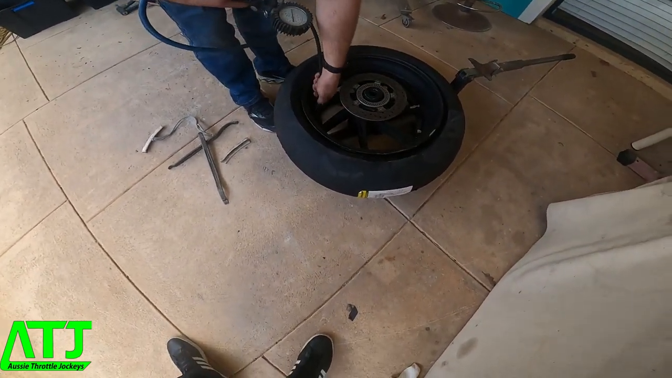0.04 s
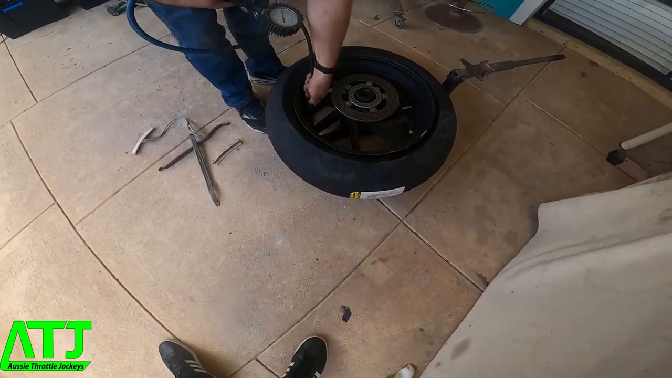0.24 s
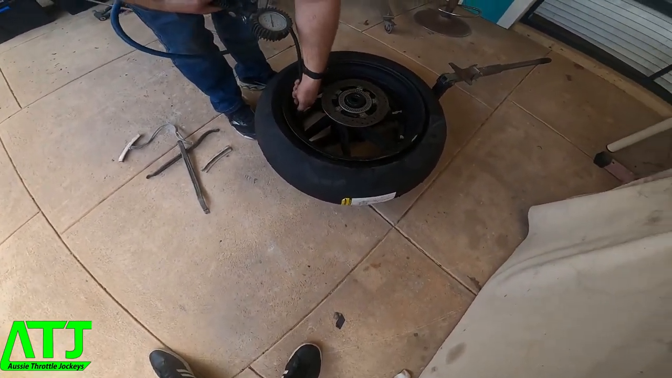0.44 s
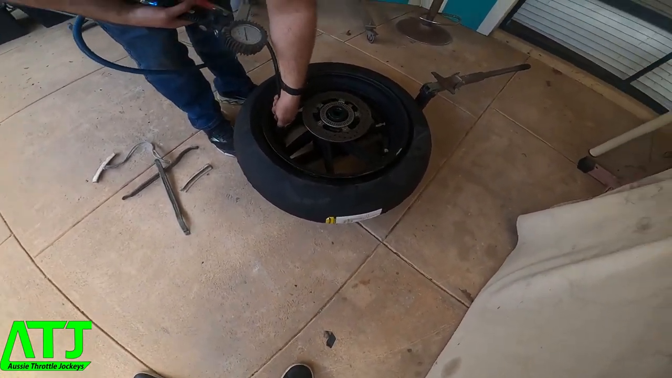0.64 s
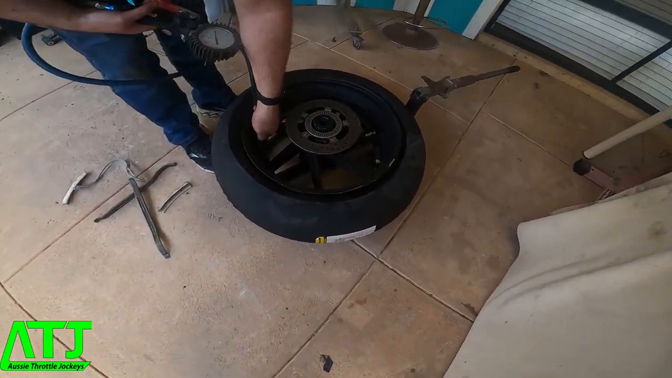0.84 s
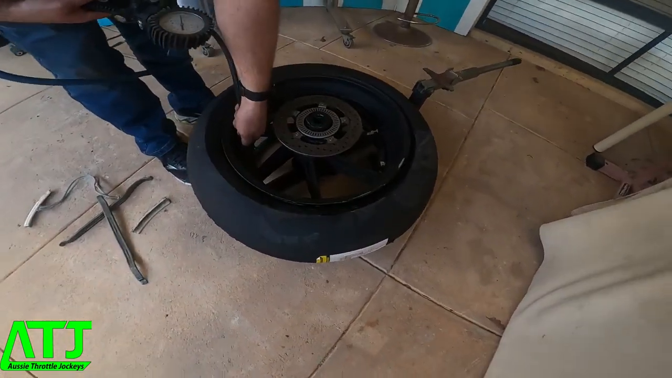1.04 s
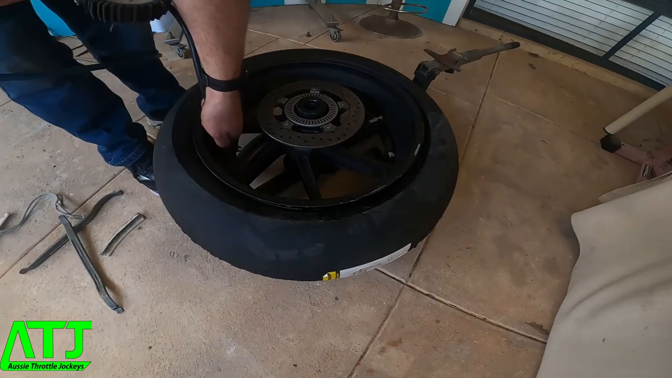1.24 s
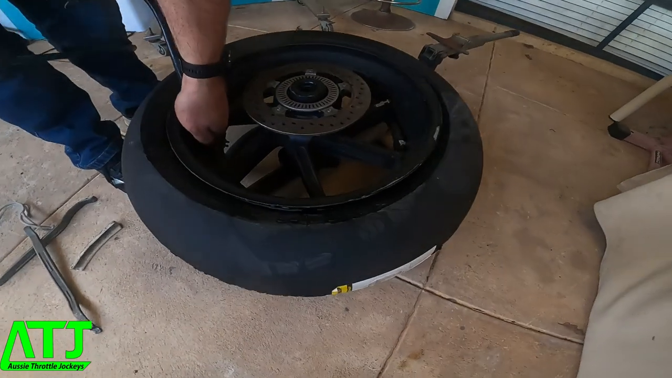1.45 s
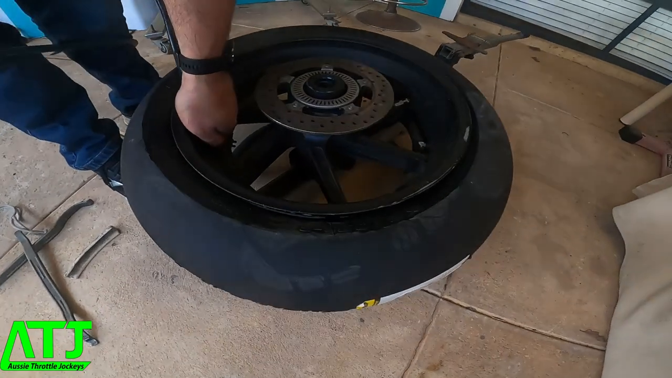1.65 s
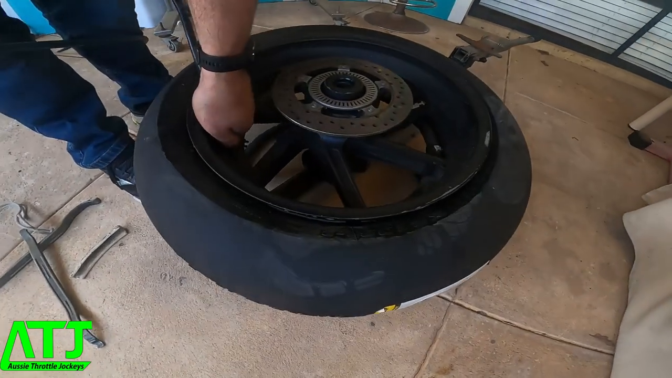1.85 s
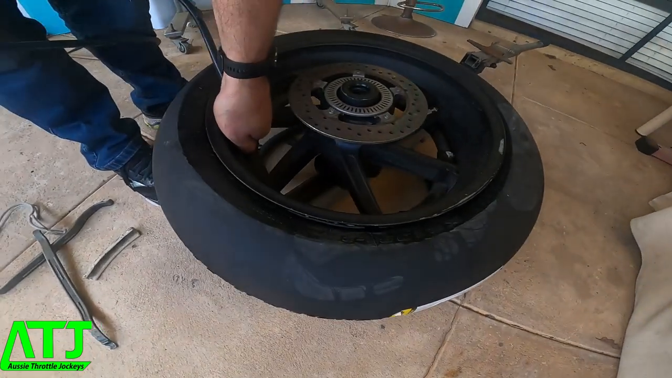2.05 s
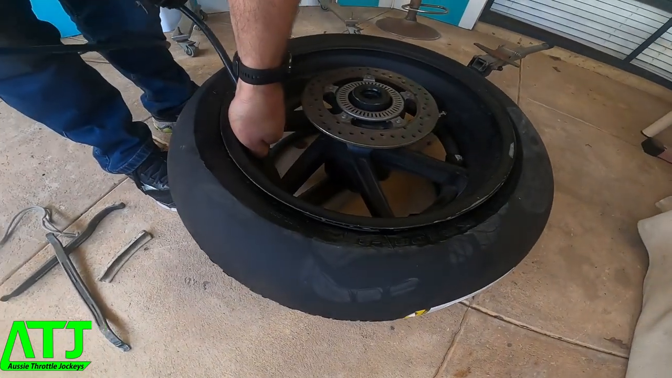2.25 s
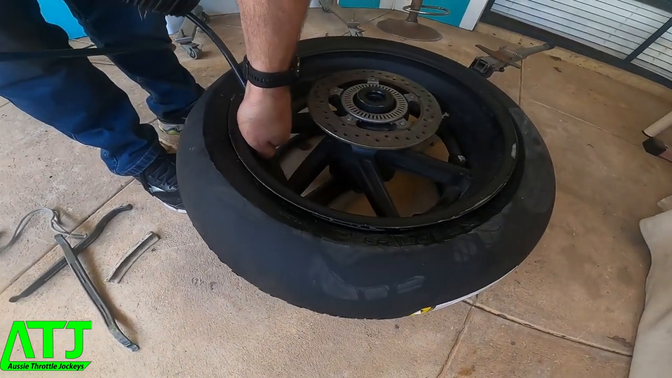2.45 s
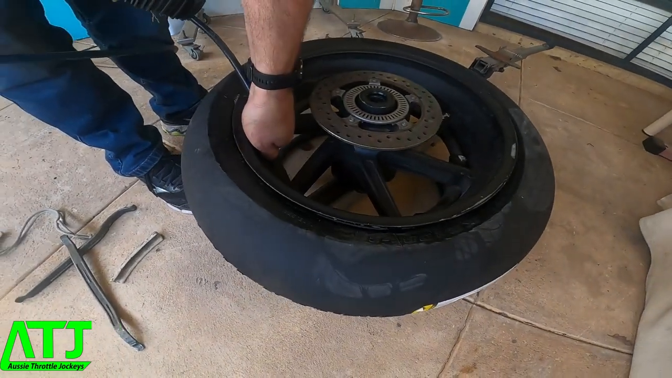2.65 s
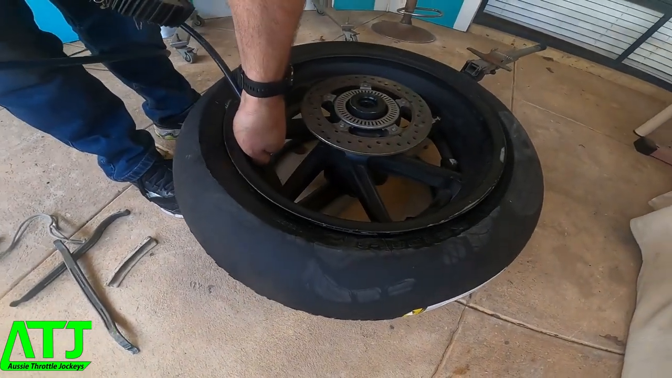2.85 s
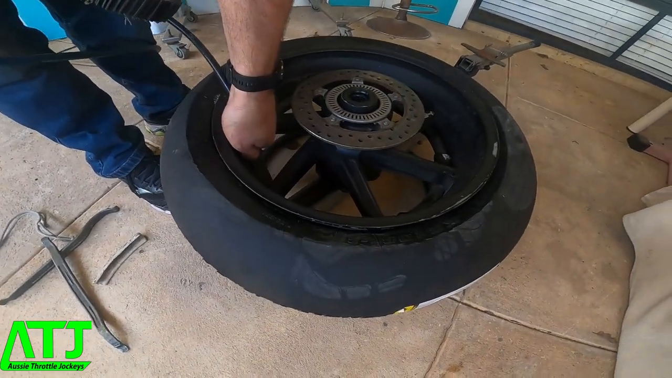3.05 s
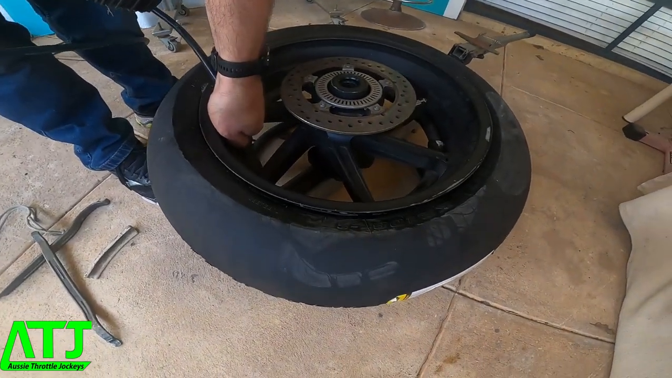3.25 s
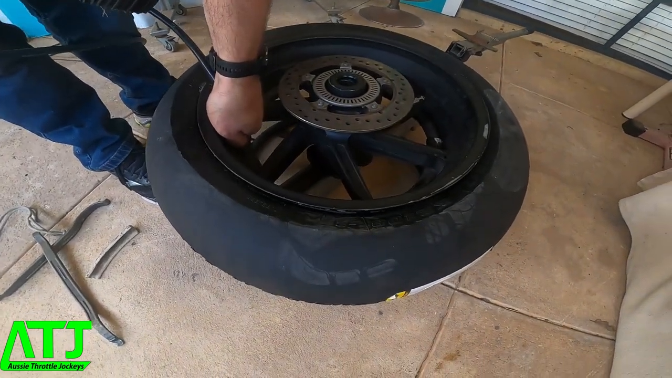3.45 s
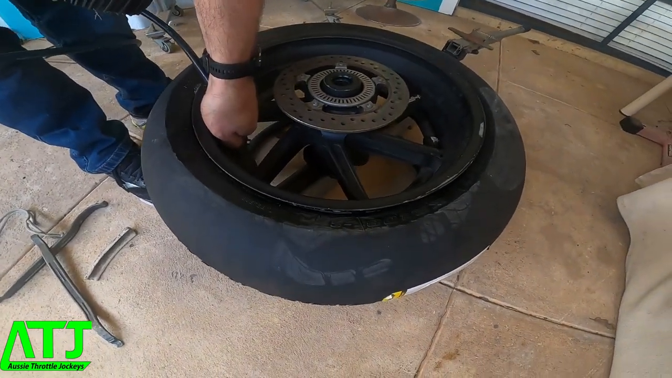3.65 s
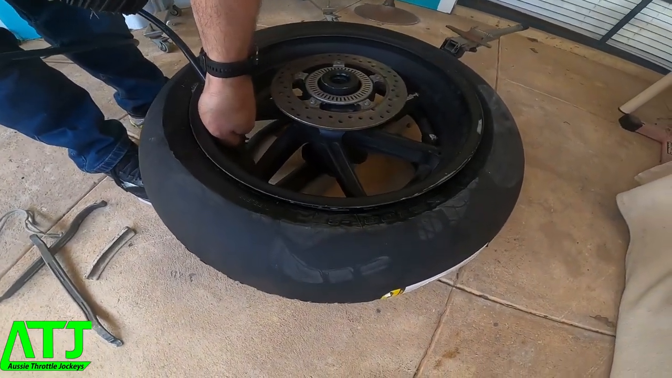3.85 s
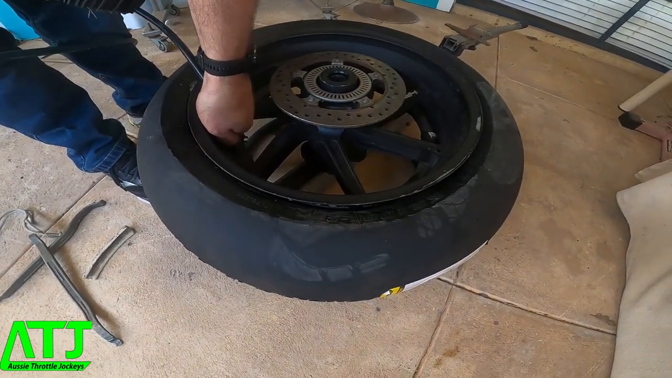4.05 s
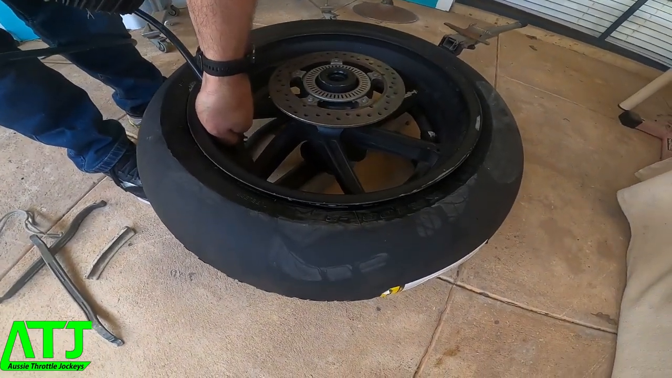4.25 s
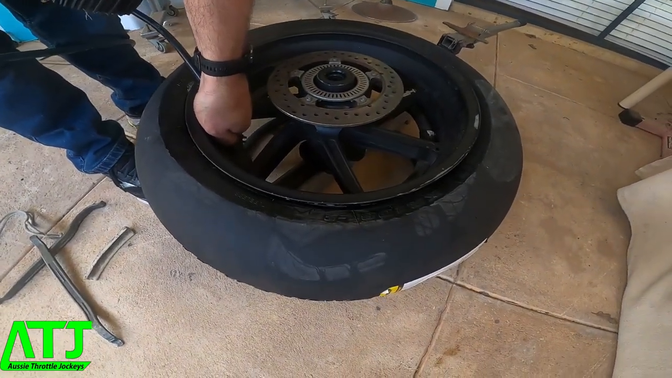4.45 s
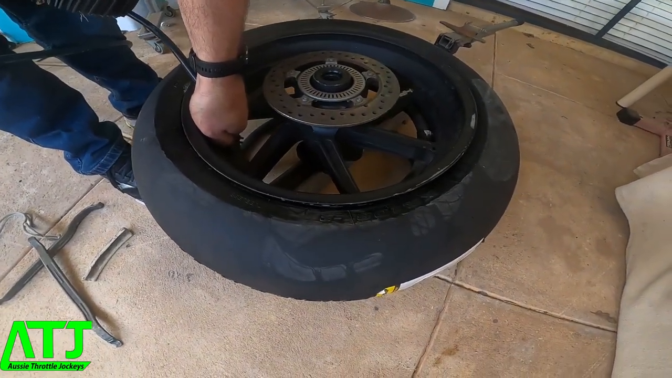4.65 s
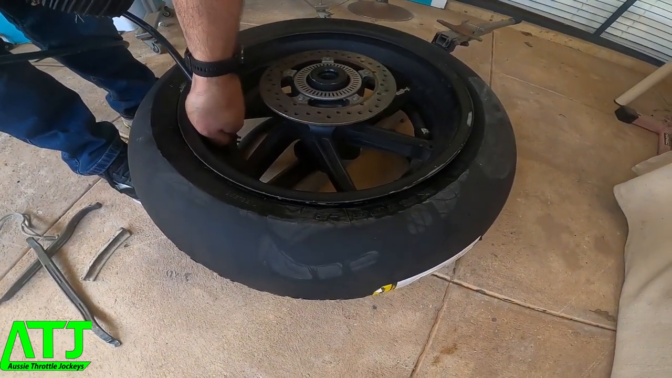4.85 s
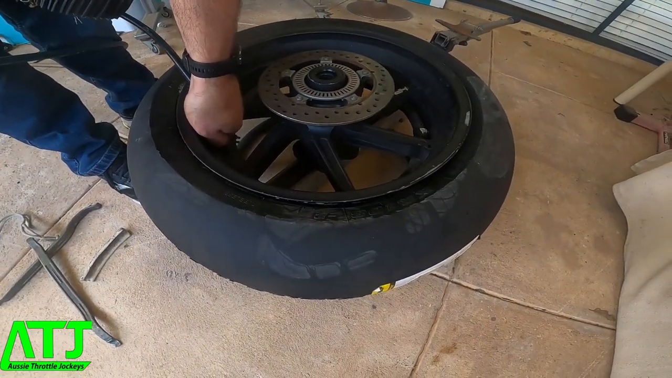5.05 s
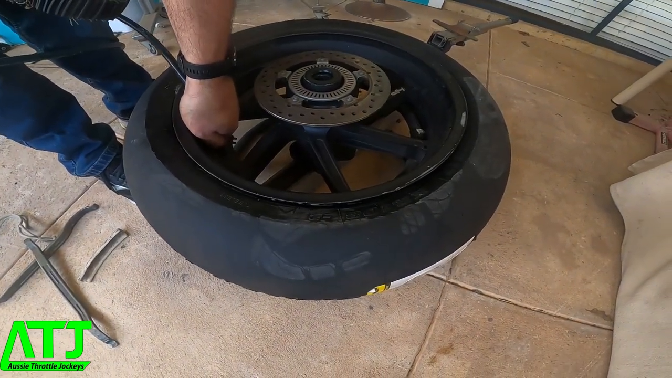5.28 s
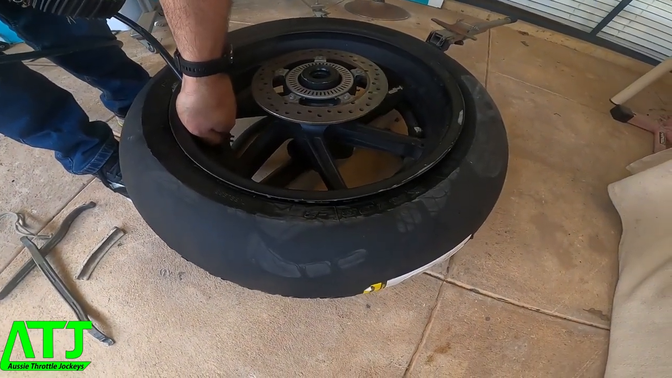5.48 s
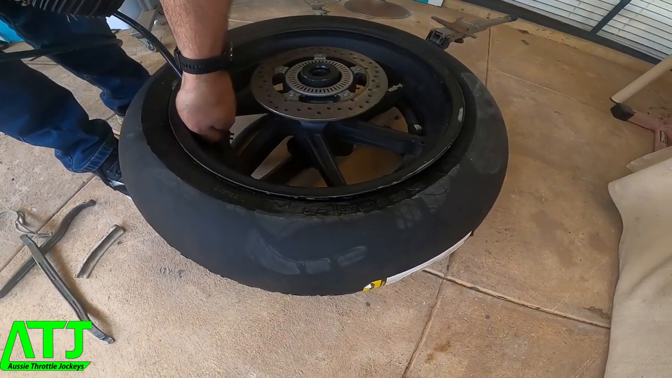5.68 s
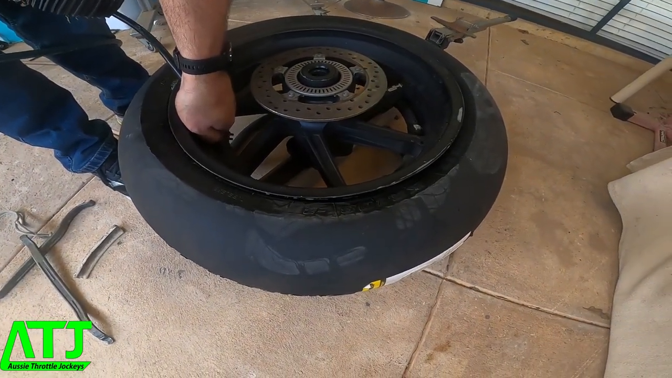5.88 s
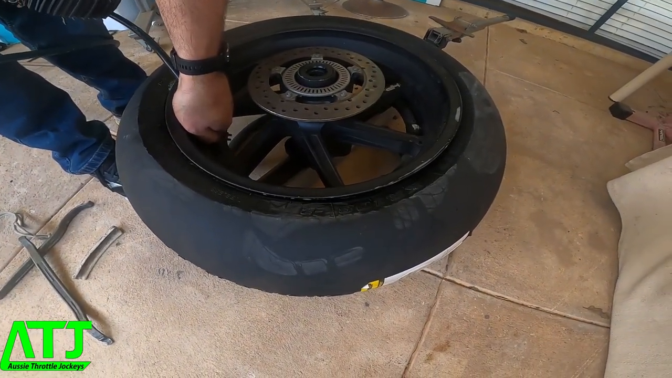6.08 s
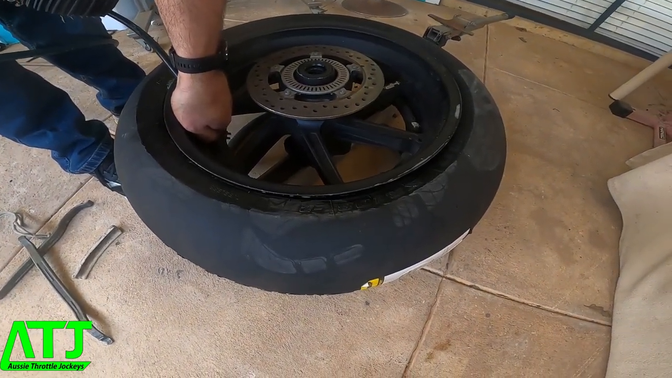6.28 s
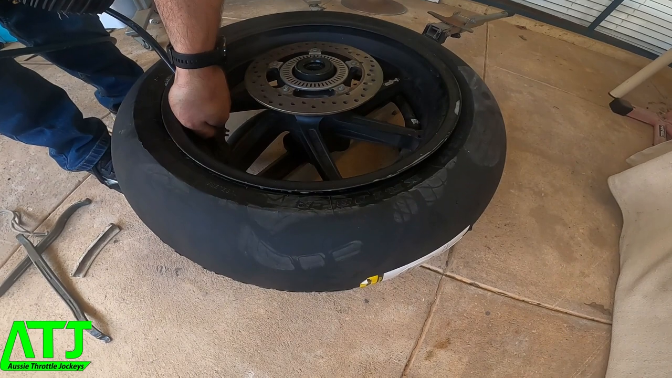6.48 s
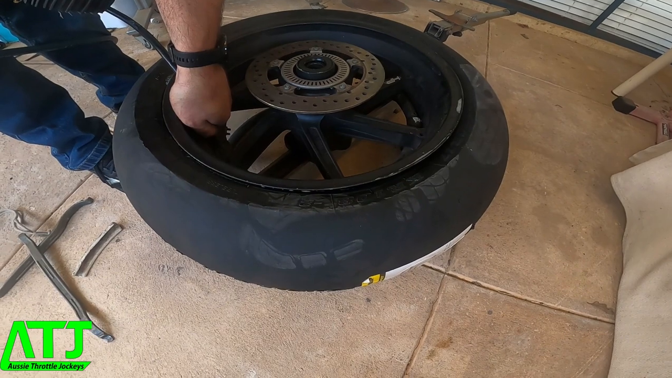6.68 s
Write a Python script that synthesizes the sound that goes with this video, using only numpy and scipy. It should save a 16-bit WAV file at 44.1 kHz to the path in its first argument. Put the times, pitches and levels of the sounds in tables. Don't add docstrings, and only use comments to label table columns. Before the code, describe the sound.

A quiet garage with soft low rumble; a faint motor tone stops around 0.3 seconds while a thin high air leak dwindles. At 0.5 a brief hose scuff and tiny metal tick sound, with another click at 0.9. From 1.0 to 1.25 brass ticks rattle rapidly against the valve and rim, mixed with scraping and dull knocks. Around 1.45 to 1.6 heavier, tightly damped thumps hit the slack tyre, with duller clicks and rubbing; a crisp clip snaps at 1.7. At 2.04 the valve gives way with a sharp click and low thump. Loud air bursts in, brightest at first, then a steady hiss coloured by many metallic, hollow resonances. From 3.0 to 3.7 the rough escaping air subsides as the bead settles. The resonant hiss continues to the end at about 6.5, slowly losing level and treble, over a barely audible compressor hum until nearly 5.

```python
import sys
import numpy as np
from scipy import signal
from scipy.fft import rfft, irfft, next_fast_len
from scipy.io import wavfile
from scipy.ndimage import uniform_filter1d

SR = 44100
rng = np.random.default_rng(int(sys.argv[2]) if len(sys.argv) > 2 else 0)


def bounce(signal):
    frames = np.transpose(np.atleast_2d(signal))
    limited = np.clip(frames, -1, 1)
    pcm = np.round(limited * 32767).astype(np.int16)
    wavfile.write(sys.argv[1], SR, pcm)


def decibels_to_gain(level_db):
    exponent = np.asarray(level_db, float) / 20
    return 10 ** exponent


N = 296352
T = np.arange(N) / SR
M = next_fast_len(N)
HZ = np.maximum(np.arange(M // 2 + 1) * SR / M, 1)

# frequency_hz, density_db (per Hz)
RUMBLE_COLOUR = [(12, -32), (20, -11), (54, 7), (130, -2.5), (150, -3), (186, -8), (216, -15), (247, -19.5),
                 (300, -18), (390, -53), (660, -120)]
STILL_AIR_COLOUR = [(200, -22), (300, -20), (550, -23), (1200, -25), (1800, -22), (2500, -17), (4000, -21),
                    (7600, -29), (11000, -37), (13500, -44), (15500, -47)]
SEEP_COLOUR = [(350, -72), (600, -42), (2490, -27), (3560, -2), (4160, 0), (4880, -10), (6270, -32),
               (7940, -35), (10200, -26), (14000, -39), (15500, -48)]
SCUFF_COLOUR = [(290, -88), (600, -25), (922, -3.5), (1250, 5), (1750, -6), (2400, -11), (2900, -16),
                (3550, -5), (4300, -19), (5300, -20), (6500, -13.5), (8000, -26), (15000, -48)]
RUB_COLOUR = [(240, -44), (400, -41.5), (602, -28), (894, 0.5), (1310, 2.5), (1540, -2), (1690, -4),
              (2190, -2), (3050, -5), (3660, -5), (4130, -6.5), (7470, -17.5), (15000, -47)]
JET_COLOUR = [(180.0, -35.8), (500.0, -34.7), (1150.0, -37.4), (1500.0, -29.5), (2200.0, -26.6),
              (3000.0, -25.9), (3600.0, -25.2), (4500.0, -17.7), (5500.0, -16.8), (7000.0, -16.7),
              (8500.0, -18.9), (13000.0, -28.3)]
SEAL_COLOUR = [(88, -25), (150, -25.5), (620, -17), (798, -19), (1740, -13), (2030, -24), (2990, -6),
               (3420, -4), (5680, -7), (7450, -1.5), (8210, -6), (12100, -63), (15600, -5)]
LOOSE_COLOUR = [(20, -2), (1700, -3), (1850, -1), (3000, -1), (3700, 1), (4100, 3), (4500, 0), (4800, -3),
                (5150, 1), (5500, -1), (5800, -9), (6050, -2), (6900, -4), (7600, -2), (7950, -5),
                (8400, 0), (8750, -4), (9000, -1), (17000, -1)]
# frequency_hz, gain_db
RUSH_COLOUR = [(1300, 2.5), (1800, -4.5), (2400, -3), (3200, -1.5), (5500, 0.5), (6100, 3), (6900, 6.5),
               (8000, -0.5), (13000, 1)]

# peak_s, rise_s, fall_s, rumble_db, murmur_db (relative)
SHIFTS = [(.27, 0.19, 0.37, -58, -26), (.56, 0.28, 0.8, -48.5, -23), (.8, 0.45, 0.24, -63, 21),
          (1.0, 0.057, 0.32, -63, 24.5), (1.23, 0.15, 0.2, -46, 11), (1.54, 0.087, 0.085, -45.5, 23.5),
          (1.68, 0.22, 0.28, -54.5, 11.5), (1.95, 0.29, 0.12, -55.5, -15), (2.046, 0.013, 0.15, -33.5, 0),
          (2.24, 0.29, 0.68, -61.5, 26), (6.0, 3.8, 1.2, -59.5, -2), (3.8, 0.45, 0.65, -62, -10),
          (6.25, .4, 0.31, -64, -3)]
# time_s, pitch_hz, level_db
HUM = [(1.6, 127.8, -48), (2.05, 131, -56.5), (3.25, 136.7, -61), (3.8, 138.2, -65.5), (4.84, 135.5, -63.5),
       (4.95, 133, -81.5)]
# pitch_hz, level_db
SPIN_DOWN = [(59.2, -52.5), (118.4, -54), (177.6, -69)]

# peak_s, rise_s, fall_s, level_db, brightness_db
SCUFFS = [
    (.475, 0.0071, 0.13, -41, 1.8),
    (.505, 0.036, 0.05, -59, 1),
    (.528, 0.049, 0.013, -61, 2),
]
# peak_s, rise_s, fall_s, level_db, brightness_db
RUBS = [
    (1.006, .03, .11, -62, 10),
    (1.102, .025, .08, -49, 0),
    (1.16, .08, .2, -47, -5),
    (1.204, .03, .06, -45, 6),
    (1.44, .3, .08, -57, 9.5),
    (1.55, .3, .11, -48, -12),
    (1.7, .012, .2, -58, 9),
    (1.83, .02, .16, -60, 1),
]
# start_s, peak_db, pitch_hz, t60_s, carcass_ring_db
KNOCKS = [(1.1, -41.5, 249.6, 0.19, -8), (1.196, -33.5, 72.7, 0.049, 0), (1.249, -23, 129, 0.019, -14),
          (1.311, -32.5, 98, 0.019, -20), (1.457, -28, 225, 0.048, 8), (1.466, -21, 150, 0.02, -26),
          (1.475, -26, 51.1, 0.019, -2), (1.483, -18.5, 322, 0.014, -8), (1.495, -19.5, 184, 0.014, -11),
          (1.509, -21.5, 200, 0.013, 4), (1.52, -31, 51.1, 0.029, -12), (1.538, -13.5, 343, 0.016, -4.5),
          (1.551, -31, 75.4, 0.021, 2), (1.572, -24.5, 82, 0.081, 2.5), (1.618, -36, 84, 0.055, -12),
          (1.665, -35.5, 87, 0.11, -4), (1.724, -37, 92, 0.05, -16), (2.045, -29, 80.7, 0.032, -15),
          (2.066, -16, 57, 0.015, -31)]
# pitch_hz, level_db, t60_s
CARCASS = [(32.5, -15, 0.78), (75.4, -5, 0.63), (170, 0.5, 0.084), (241, -18, 0.86), (304.6, -3.5, 0.16),
           (343, -12, 0.48), (391.6, -9.5, 0.43), (497, -39, 0.72)]
# start_s, peak_db, pitch_hz, rim_shiver_db
TICKS = [(0.472, -41, 3500, 1), (0.873, -37, 3770, -21), (0.989, -37, 6600, 9), (0.998, -39, 1510, -20),
         (1.0052, -17, 3300, -6), (1.095, -33, 2460, 5), (1.103, -33, 1080, 3), (1.111, -27, 1270, -14),
         (1.1128, -24, 2600, -15), (1.1151, -12.5, 3420, -17), (1.1205, -12.5, 3280, -23),
         (1.127, -23, 1850, -4), (1.132, -25, 3500, -2), (1.137, -33, 2020, -12), (1.1423, -19, 2580, -19),
         (1.153, -27, 1690, -8), (1.162, -24.5, 3100, -10), (1.176, -23, 2280, -11),
         (1.187, -24, 2500, -12), (1.193, -26, 1920, -12), (1.1963, -16, 3150, -10),
         (1.2038, -18, 2800, -20), (1.207, -21, 2660, -17), (1.21, -15, 2360, -23), (1.218, -20, 2240, -21),
         (1.229, -30, 1770, -1.5), (1.242, -34, 915, -4), (1.459, -27.5, 1000, -8), (1.465, -28, 1280, -17),
         (1.472, -29, 885, -9), (1.484, -29, 810, 1), (1.499, -40, 910, -10), (1.509, -32, 1900, -10),
         (1.511, -15.5, 1460, -17), (1.525, -38, 1210, -8), (1.537, -34, 1500, -3),
         (1.542, -19.5, 840, -16), (1.55, -27, 1090, -17), (1.556, -37, 1300, -13), (1.567, -37, 1200, -15),
         (1.579, -34, 2660, -15), (1.641, -47, 3200, -11), (1.684, -38, 4770, -13), (1.696, -22, 2060, -19),
         (1.697, -14, 3170, -16), (1.6984, -26, 5730, -4), (1.816, -37, 2850, -9.5),
         (2.043, -19.5, 5870, 12), (2.058, -31, 5200, -12), (2.06, -28, 5100, -20)]
# pitch_ratio, level_db, share_of_t60
BRASS = [(1.033, 13, 0.55), (0.29, -19, 0.28), (1.31, 2, 0.49), (0.47, -6, 1), (0.603, 5, 0.62)]
# start_s, level_db
SNAPS = [
    (.32, -63),
    (.873, -53),
    (1.005, -38),
    (1.205, -37),
    (1.546, -50),
    (1.684, -52),
    (1.695, -30),
    (1.816, -62),
    (2.043, -16.5),
]

# time_s, level_db
OPENING = [(2.016, -56), (2.034, -44), (2.04, -5), (2.046, 3), (2.062, 10.5), (2.066, 0), (2.076, -1),
           (2.14, 3), (2.5, 2), (3.0, 3), (3.6, 2.5)]
# cut_on_hz, ring_step_hz, width_hz, level_db, slope_db (per order)
FAMILIES = [(0.0, 214.1, 18, -32, 0.9), (1338.2, 214.2, 21.4, -16.1, -0.8),
            (1689.5, 224.0, 23.0, -15.4, -0.6), (2338.7, 217.4, 22.4, -11.0, -0.6),
            (2847.2, 222.9, 15.8, -18.1, -0.1), (3169.7, 214.0, 31.6, -6.7, -0.7),
            (3485.0, 218.1, 23.9, -14.1, -0.0), (4743.7, 219.0, 18.2, -4.6, -0.4),
            (6175.5, 221.6, 33.2, -12.5, -0.2), (7499.2, 215.5, 43.9, -12.9, -0.5),
            (9025.0, 222.9, 89.2, -19.2, -0.6), (10410.9, 214.0, 49.4, -23.0, -0.3),
            (11775.0, 224.3, 90.0, -28.0, -0.1)]
# pitch_hz, width_hz, level_db
SEATED_MODES = [(1274.0, 16.8, -22.7), (1345.2, 13.3, -9.7), (2330, 10, -2.5), (2579, 12, -9),
                (2676, 12, -11), (2379.6, 12.0, -4.6), (3179, 13.4, -6), (3290, 90.0, -8), (3302, 18, -6),
                (3492.0, 80, -7), (3509, 20, -6), (3708.3, 28.8, -4.7), (3931.1, 12.9, -5.9),
                (4722, 20, 1.5), (4803.5, 8.2, -7.0), (5779.7, 8.0, -7.0), (6087.9, 26.5, -7.0),
                (6229.5, 26, -4.5), (6807.4, 18.5, -10.7), (7346.9, 28.3, -10.4), (7529.8, 36.4, -2.7),
                (7702.0, 89.7, -5.8), (8184.8, 28.9, -11.3), (8623.4, 30.8, -13.2)]
# pitch_hz, width_hz, level_db
LOOSE_MODES = [(1350, 18, -13), (1710, 20, -14), (1814, 16, -11), (1911, 16, -11), (2325, 20, -7),
               (2374, 18, -7), (2664, 18, -9), (2788, 18, -9), (3335, 50, -4), (3505, 36, -5),
               (4335, 14, -1), (4694, 20, -6), (5124, 30, -6), (5180, 30, -6), (6225, 44, -2),
               (6460, 24, -6), (7285, 40, -11), (7495, 50, -2), (7635, 50, -3), (8070, 30, -11)]
# pitch_hz, peak_s, rise_s, fall_s, level_db
BLOOMS = [
    (640, 6.0, 0.48, 0.43, -56),
    (2300, 1.78, .4, .6, -67),
]

OPEN_S = 2.14


def curve(rows):
    s, *columns = np.transpose(rows)
    fade = np.clip(np.minimum(T - s[0], s[-1] - T) / .01, 0, 1)
    return fade, *(np.interp(T, s, c) for c in columns)


def power(points):
    hz, db = np.transpose(points)
    return decibels_to_gain(2 * np.interp(np.log(HZ), np.log(hz), db, left=-90, right=-90))


def walk(rate_hz):
    k = int(SR / rate_hz)
    steps = np.repeat(rng.standard_normal(N // k + 1), k)
    w = uniform_filter1d(uniform_filter1d(steps, k), k)[:N]
    return w / w.std()


def swell(s, rise_s, fall_s, db):
    return decibels_to_gain(db - 20 * np.maximum((s - T) / rise_s, (T - s) / fall_s))


def noise(density, lo_hz, hi_hz, like, lag=0.15, pan_db=0., grains=1., turn=0.):
    shared, left, right = rfft(rng.standard_normal((3, M)) * grains)
    like = np.clip(like, 0, 1)
    late = np.exp(-2j * np.pi * HZ * lag / SR + 1j * turn)
    common = np.sqrt(like) * shared * np.array([late, np.ones(len(HZ))])
    pair = common + np.sqrt(1 - like) * np.array([left, right])
    density = density / (like * np.abs(1 + late) ** 2 / 4 + (1 - like) / 2)
    pair = pair * np.sqrt(density) * decibels_to_gain(np.reshape([pan_db, -pan_db], (2, -1)) / 2)
    band = (HZ > lo_hz) & (HZ < hi_hz)
    rms = np.sqrt(2 * np.sum(np.abs(pair.mean(axis=0)[band]) ** 2))
    return irfft(pair, M)[:, :N] * M / rms


def tilted(x, corner_hz, low_db, high_db):
    low = irfft(rfft(x, M) / (1 + (HZ / corner_hz) ** 8), M)[:, :N]
    return low * decibels_to_gain(low_db) + (x - low) * decibels_to_gain(high_db)


def decay(t, t60):
    return np.exp(-np.log(1000) * t / t60)


def ring(hz, t60, count=SR // 2):
    t = np.arange(count) / SR
    return np.sin(2 * np.pi * hz * t) * decay(t, t60)


def add(out, s, x):
    i = int(s * SR)
    out[..., i:i + x.shape[-1]] += x[..., :N - i]


def garage():
    low = decibels_to_gain(-64) + sum(swell(*row[:4]) for row in SHIFTS)
    above = decibels_to_gain(-94 + 1.0 * walk(0.98)) + sum(swell(*row[:4]) * decibels_to_gain(row[4]) for row in SHIFTS)
    rumble = low * decibels_to_gain(2.1 * walk(6.8)) * noise(power(RUMBLE_COLOUR), 25, 250, 0.83, pan_db=-0.1)
    murmur_colour = power([(150, -1.5), (250, 0.0), (600, -8.5), (1000, -15.5)])
    murmur = above * decibels_to_gain(-14.0) * noise(murmur_colour, 130, 900, 0.79)
    air = decibels_to_gain(-58.5) * noise(power(STILL_AIR_COLOUR), 600, 15000, 0.57, pan_db=2.5)
    air = tilted(air, 3300, 0, np.interp(T, [1.5, 1.9], [0, -9]))
    fade, hz, db = curve(HUM)
    hum = fade * decibels_to_gain(db - 2 + 1.5 * walk(4)) * np.sqrt(2) * np.sin(2 * np.pi * np.cumsum(hz) / SR)
    stop = np.clip((.32 - T) / 0.069, 0, 1)
    motor = sum(decibels_to_gain(db) * np.sqrt(2) * np.sin(2 * np.pi * hz * T) for hz, db in SPIN_DOWN)
    return rumble + murmur + air + hum + stop * motor


def seep():
    pushed_s, sag_db_per_s, pushed_sag_db_per_s = 0.46, 19.5, 14
    db = -47 - sag_db_per_s * T - (T > pushed_s) * pushed_sag_db_per_s * (T - pushed_s)
    return decibels_to_gain(db + 0.32 * walk(28)) * noise(power(SEEP_COLOUR), 2400, 5200, 0.86, pan_db=3.5)


def rubs():
    bursts = decibels_to_gain(2.5 * rng.exponential(size=-(-M // 60)))
    grains = np.interp(np.arange(M), np.arange(0, M, 60), bursts)
    out = 0
    for rows, colour, grit in ((SCUFFS, SCUFF_COLOUR, .3), (RUBS, RUB_COLOUR, .6)):
        rub = noise(power(colour), 600, 3300, 0.72, pan_db=2.5, grains=grains ** grit)
        body = tilted(rub, 1950, 0, -120)
        below_top = tilted(rub, 7200, 0, -120)
        for *stroke, bright_db in rows:
            bands = (decibels_to_gain(-4) * body + decibels_to_gain(bright_db + 0.42) * (below_top - body)
                     + decibels_to_gain(3 + 1.64 * bright_db) * (rub - below_top))
            out = out + swell(*stroke) * bands
    return out


def knocks():
    out = np.zeros(N)
    t = np.arange(SR // 2) / SR
    signs = rng.choice([-1, 1], (len(KNOCKS), len(CARCASS)))
    for (s, db, hz, t60, carcass_db), sign in zip(KNOCKS, signs):
        carcass = sum(k * decibels_to_gain(g_db) * ring(f, 0.76 * d) for k, (f, g_db, d) in zip(sign, CARCASS))
        push = -ring(hz, t60) * t
        add(out, s, decibels_to_gain(db) * (push / np.abs(push).max() + decibels_to_gain(carcass_db - 5.5) * carcass))
    return out * decibels_to_gain(np.array([[.4], [-.4]]))


def ticks():
    contact_s, garage_t60_s = 0.00039, 0.37
    out = np.zeros((2, N))
    echoes = noise(power(RUB_COLOUR), 500, 12000, 0.6, pan_db=3.0)
    t = np.arange(SR // 3) / SR
    onset = 1 - np.exp(-t / contact_s)
    for (s, db, hz, shiver_db), chance in zip(TICKS, rng.random((len(TICKS), 6))):
        t60 = 0.01 * (3500 / hz) ** 0.99
        body = sum(decibels_to_gain(g_db) * ring(hz * ratio * (0.888 + 0.23 * c), t60 * share, count=2048)
                   for (ratio, g_db, share), c in zip(BRASS, chance))
        body = np.pad(body, (0, len(t) - len(body))) * onset ** 2
        i = int(chance[5] * (N - len(t)))
        echo = echoes[:, i:i + len(t)]
        crack = signal.lfilter(*signal.iirpeak(hz, 1.2, SR), echo * np.exp(-t / 0.0048) * onset)
        shiver = signal.lfilter(*signal.iirpeak(hz, 8.0, SR), echo) * decay(t, 0.33)
        tail = echo * decay(t, garage_t60_s) * (1 - np.exp(-t / 0.0032))
        edge = np.diff(echo, prepend=0) * np.exp(-t / 0.00042) * (1 - np.exp(-t / 0.00022))
        edge = edge * (hz / 3500) ** 2
        near = body / np.abs(body).max() + decibels_to_gain(-8) * crack + decibels_to_gain(-9) * edge
        near = near / np.abs(near).max()
        add(out, s, decibels_to_gain(db) * (near + decibels_to_gain(shiver_db) * shiver + decibels_to_gain(-29.5) * tail))
    return out


def snaps():
    steel = power([(3000, 0), (7000, 5), (12000, -4), (13500, -10), (14800, -22)])
    bright = noise(steel, 3000, 15000, 0.95, pan_db=-6.0)
    return bright * sum(swell(s + 0.001, 0.00088, 0.0057, db) for s, db in SNAPS)


def cavity_density(peaks, warm, damping, ladder_db):
    order = np.arange(1, 17)
    modes = [np.transpose(peaks)]
    for cut_hz, step_hz, width, db, slope_db in FAMILIES:
        ladder_hz = warm * np.hypot(cut_hz, order * step_hz)
        modes.append((ladder_hz, damping * width + 0 * order, ladder_db + db + slope_db * order))
    hz, width, db = np.hstack(modes)[:, :, None]
    grid = np.arange(0, 16000, 4)
    lines = np.sum(decibels_to_gain(2 * db) / (1 + (2 * (grid - hz) / width) ** 2) ** 1.5, axis=0)
    hiss = power([(60, -60)] + JET_COLOUR + [(16000, -34)]) * decibels_to_gain(-1.5)
    top = power([(20, -20), (200, 0), (12500, 0), (14200, -1), (15700, -4), (16500, -30)])
    return (np.interp(HZ, grid, lines) + hiss) * top


def waver(x, spread_db):
    hz, s, z = signal.stft(x, SR, nperseg=2048)
    field = uniform_filter1d(rng.standard_normal(z.shape[1:]), size=2, axis=0)
    field = uniform_filter1d(field, size=14, axis=1)
    rush = np.clip((s - 2.05) / (OPEN_S - 2.05), 0, 1) * np.exp(-(np.maximum(s - OPEN_S, 0) / 0.46) ** 2)
    rush_db = np.outer(np.interp(hz, *np.transpose(RUSH_COLOUR)), rush)
    return signal.istft(z * decibels_to_gain(spread_db * field / field.std() + rush_db), nperseg=2048)[1][:, :N]


def jet_levels():
    fade, flow_db = curve(OPENING + [(7.47, 0.0067)])
    since = np.maximum(T - OPEN_S, 0)
    rush = np.exp(-since / 0.13)
    slip = np.exp(-((T - 3.37) / 0.092) ** 2)
    cavity_db = -29.5 + flow_db - 0.1745 * since - 1 * rush - 1 * slip
    treble_db = 3 - 0.87 * since + 0.7 * slip - 0.42 * flow_db
    treble_db = treble_db + 5.5 * rush * np.interp(T, [OPENING[2][0], OPEN_S], [.2, 1])
    return fade, since, cavity_db, treble_db


def filling():
    fade, since, cavity_db, treble_db = jet_levels()
    apart = HZ < 6890
    sides = np.interp(HZ, np.arange(0, SR, 70), rng.standard_normal(SR // 70))
    place = dict(like=np.where(apart, .86, .985), lag=2 * apart * np.minimum(3500 / HZ, 1),
                 turn=.45 * sides * apart * np.minimum(HZ / 3000, 1),
                 pan_db=np.where(HZ > 8270, -6.8, np.where(apart, 1.2, .3)))

    seated = noise(cavity_density(SEATED_MODES, 1, .62, 3), 1200, 5500, **place)
    loose = noise(cavity_density(LOOSE_MODES, .997, .8, 1) * power(LOOSE_COLOUR), 1200, 5500, **place)
    share = np.interp(T, (3.0, 3.67), [0, 1])
    modes = waver(np.sqrt(share) * seated + np.sqrt(1 - share) * loose, 1.7)
    lean_db = 0.48 * (np.abs(since - 1.8) - 1.0)
    modes = modes * decibels_to_gain(lean_db * np.array([[.5], [-.5]]))
    modes = tilted(modes, 4300, cavity_db + 0.37 * walk(9), cavity_db + treble_db + 0.4 * walk(9))

    edge = power([(20, 0), (14600, 0), (15700, -6), (16500, -28)])
    escape = noise(power(SEAL_COLOUR) * edge, 320, 1060, **place)
    escape = escape * decibels_to_gain(np.interp(T, [2.08, 2.18, 2.4, 2.6], [-2.5, 0, 0, -0.5]))
    flutter_db = (1 + .5 * share) * walk(6.12)
    escape = escape * (1 - 0.89 * share) * decibels_to_gain(cavity_db - 25.5 + flutter_db)

    bloom = 0
    for hz, *row in BLOOMS:
        line = 1 / (1 + (2 * (HZ - hz) / 30) ** 2) ** 2
        bloom = bloom + swell(*row) * noise(line, 400, 3000, 0.76)
    return bloom + fade * (modes + escape)


def scene():
    return garage() + seep() + rubs() + knocks() + ticks() + snaps() + filling()


def low_pass(x):
    return signal.sosfilt(signal.butter(12, 15740, fs=SR, output="sos"), x)


def record(dry):
    rolloff = signal.cheby2(6, 40, 1.15 * 14500, fs=SR, output="sos")
    heard = signal.sosfilt(rolloff, dry)
    return low_pass(heard)


dry = scene()
out = record(dry)
bounce(out)
```